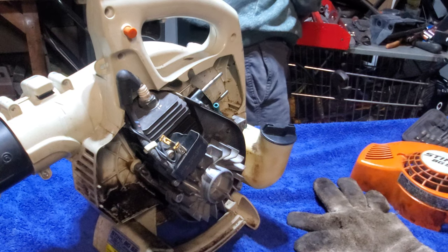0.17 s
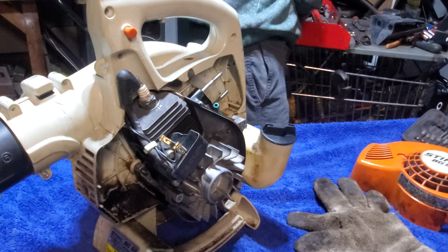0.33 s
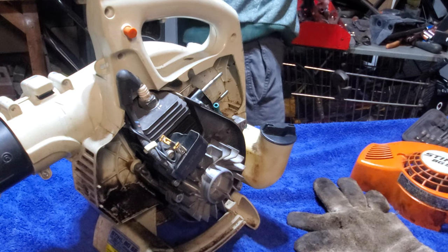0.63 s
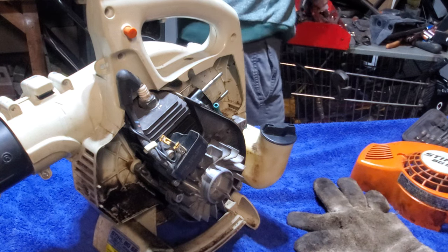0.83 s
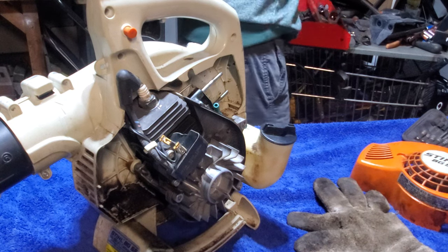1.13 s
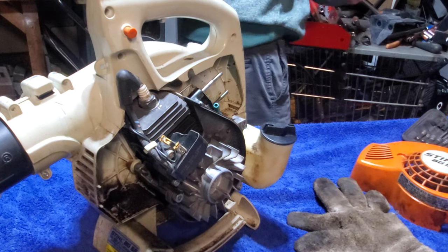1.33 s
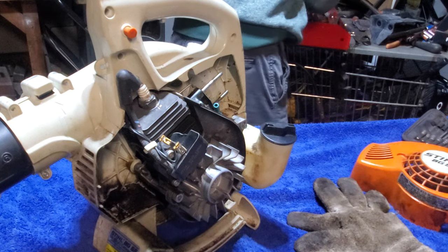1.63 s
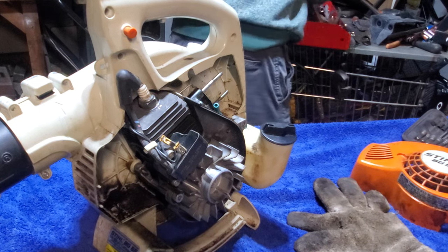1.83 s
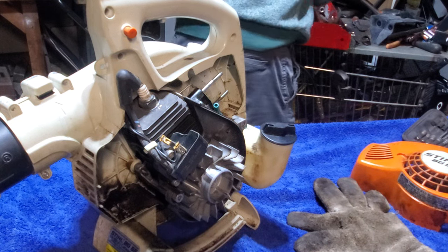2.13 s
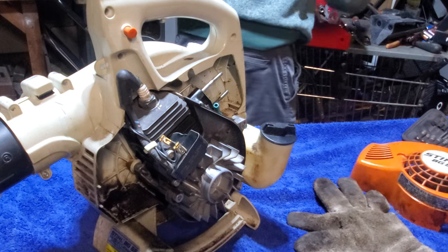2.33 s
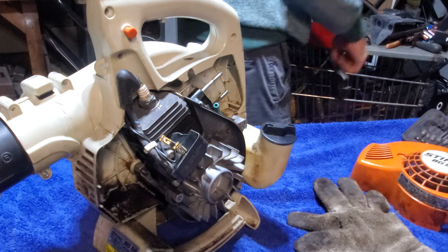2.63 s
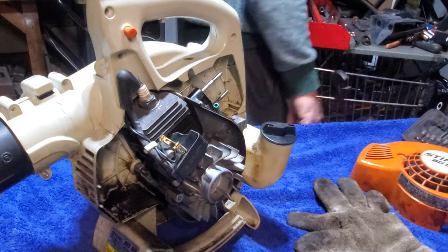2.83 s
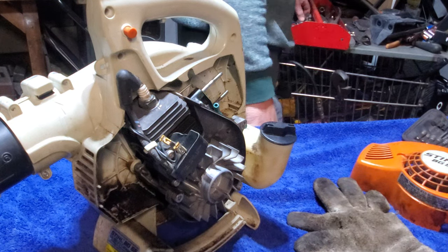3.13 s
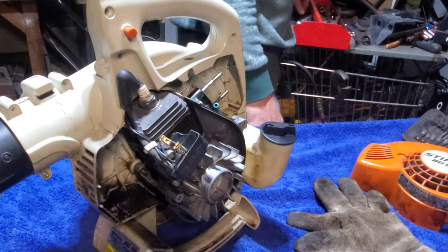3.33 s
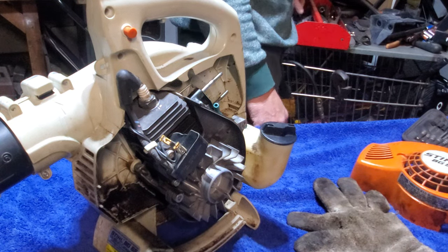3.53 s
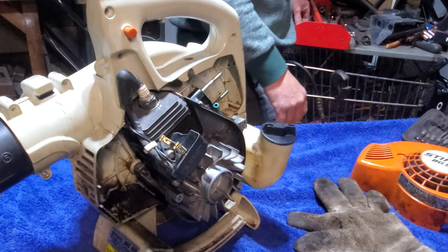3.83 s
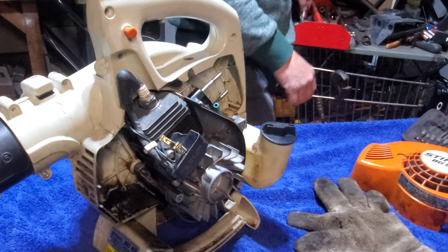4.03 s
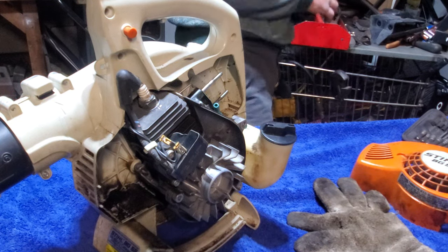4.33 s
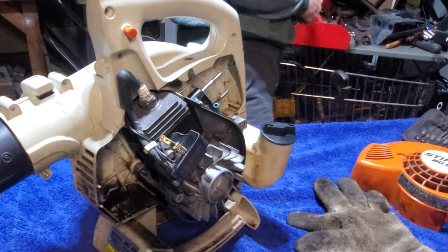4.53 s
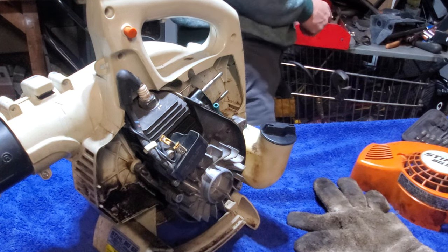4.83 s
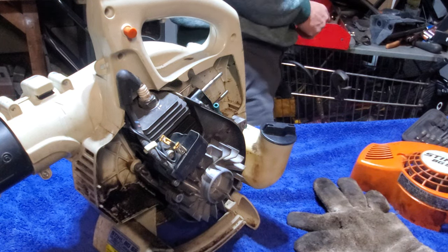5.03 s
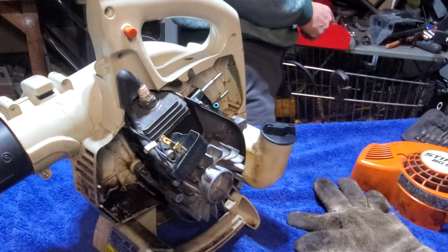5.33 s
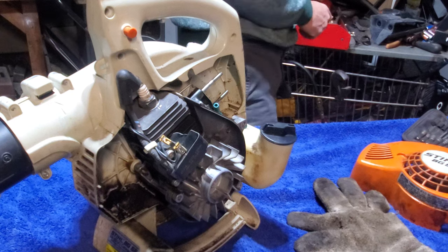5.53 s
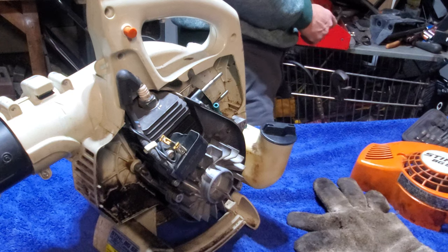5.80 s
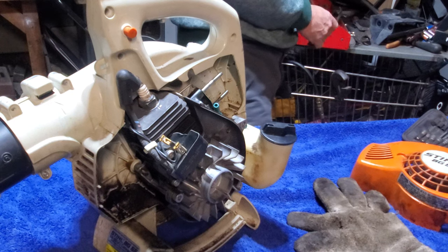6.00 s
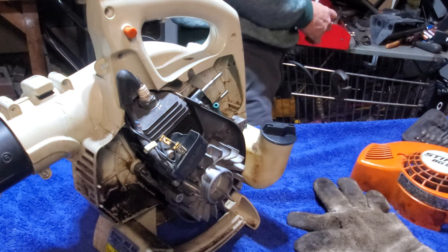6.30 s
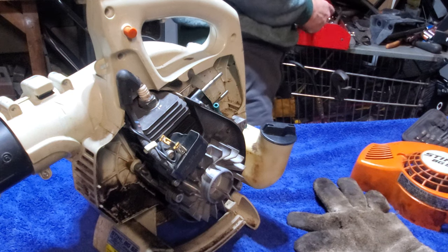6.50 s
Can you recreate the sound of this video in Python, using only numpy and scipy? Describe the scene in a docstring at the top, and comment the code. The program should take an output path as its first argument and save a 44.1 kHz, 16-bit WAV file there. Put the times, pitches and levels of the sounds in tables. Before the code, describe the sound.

Steel sockets and hand tools clink, clatter and thud in a metal tray in bursts, with brief ringing, in a small quiet workshop.

```python
"""Cracks, chatter and thuds of steel sockets and hand tools rummaged in a tray, in a small workshop.
Contacts are noise bursts plus short steel modes, sent through a dense room tail and the tray's resonances.
A wrench rings on, tools, tray panels and loose sockets ring as decaying sines; ticks are narrow-band contacts.
Soft shuffles are swells of filtered noise; below lie an uneven low rumble, a faint sinking drone and hiss."""
import sys
import numpy as np
from scipy import signal
from scipy.fft import rfft, irfft, next_fast_len
from scipy.io import wavfile
from scipy.ndimage import uniform_filter1d

SR = 44100
rng = np.random.default_rng(int(sys.argv[2]) if len(sys.argv) > 2 else 0)


def wav_record(signal):
    """Record a signal, one row per channel, as 16-bit PCM in the file named by sys.argv[1]."""
    frames = np.transpose(np.atleast_2d(signal))
    bounded = np.clip(frames, -1, 1)
    # unit amplitude maps onto the largest positive 16-bit level
    quanta = np.round(bounded * 32767).astype(np.int16)
    wavfile.write(sys.argv[1], SR, quanta)


N = 293706
TOP_HZ = 16000  # band limit
BLOW_S = .04  # contact and tick strengths refer to rms over this time

# left-right likeness of diffuse sound: (frequency [Hz], correlation [-1 to 1])
LIKENESS = [(60, 0.96), (290, .88), (640, .5), (1400, -0.078), (3100, 0.16), (7000, -0.037)]


def amp(db):
    """Decibels to gain."""
    return 10 ** (np.asarray(db) / 20)


def unit(x):
    """Scale to rms 1."""
    return x / np.sqrt(np.mean(x ** 2) + 1e-20)


def along(points, hz):
    """(Hz, value) points read on a log-frequency axis, held flat beyond the ends."""
    f, v = np.transpose(points)
    return np.interp(np.log(hz + 1), np.log(f), v)


def add(track, s, sound):
    """Mix a stereo sound in at time s."""
    start = max(round(s * SR), 0)
    part = track[:, start:][:, :sound.shape[1]]
    part += sound[:, :part.shape[1]]


def coloured(x, gain):
    """Minimum-phase (causal) filter with the given gain of frequency, by the folded cepstrum."""
    size = x.shape[-1]
    m = 2 * next_fast_len(size // 2 + 1024)
    log_gain = np.log(np.maximum(gain(np.fft.rfftfreq(m, 1 / SR)), 1e-7))
    cepstrum = irfft(log_gain)
    cepstrum[1:m // 2] *= 2
    cepstrum[m // 2 + 1:] = 0
    response = np.exp(rfft(cepstrum))
    return irfft(rfft(x, m) * response, m)[..., :size]


def evened(x, width_hz=700):
    """Flatten the broad spectral outline, keep its fine lines; mean energy about 1 a side."""
    power = np.mean(np.abs(rfft(x)) ** 2, 0)
    hz = np.fft.rfftfreq(x.shape[1], 1 / SR)
    outline = np.abs(uniform_filter1d(power, int(width_hz / hz[1]) + 1)) + 1e-9
    return coloured(x, lambda f: np.interp(f, hz, outline) ** -.5)


def diffuse(size):
    """White noise from all sides: the two microphones agree most in the bass."""
    turn = np.arccos(np.clip(along(LIKENESS, np.fft.rfftfreq(size, 1 / SR)), -1, 1)) / 2
    spectra = rfft(rng.standard_normal((2, size)))
    mid, side = irfft(spectra * [np.cos(turn), np.sin(turn)], size)
    return np.array([mid + side, mid - side])


def workshop(direct_db, build_s=0.0023, hold_s=0.032):
    """Room response: direct sound, right side first, then dense reflections that build, hold and die."""
    # reverberation of the room: (frequency [Hz], t60 [s])
    room_t60 = [(100, 0.067), (400, 0.22), (1000, 0.19), (2800, 0.22), (7000, 0.19), (15000, 0.06)]
    hz, t, z = signal.stft(diffuse(size=16384), SR, nperseg=128)
    decay_db = -60 * np.maximum(t - hold_s, 0) / along(room_t60, hz)[:, None]
    tail = signal.istft(z * amp(decay_db), SR, nperseg=128)[1]
    tail *= 1 - np.exp(-np.arange(tail.shape[1]) / SR / build_s)
    tail /= np.sqrt(np.sum(tail ** 2) / 2)
    tail[[0, 1], [5, 0]] += amp(direct_db)  # left arrives 5 samples late
    return tail


def contact(scrape_t60, steel_db, chatter_db=4, snap_db=6, count=80):
    """Steel contact, energy 1: a snap, a chattering noise scrape and many short steel modes."""
    lowest_hz, steel_t60, snap_s = 900, .09, 0.0034  # steel_t60 is the mean over the modes
    t = np.arange(SR // 5) / SR
    knots = t[::40]
    chatter = np.interp(t, knots, rng.standard_normal(len(knots)))
    crack_db = chatter_db * chatter + snap_db * np.exp(-t / snap_s) - 60 * t / scrape_t60
    crack = rng.standard_normal(len(t)) * amp(crack_db)
    place, life, phase = rng.random((count, 3)).T[:, :, None]
    # one mode at random in each of count equal bands
    hz = lowest_hz + (TOP_HZ - lowest_hz) * (np.arange(count)[:, None] + place) / count
    t60 = steel_t60 * (.5 + life)
    steel = np.sum(np.sin(2 * np.pi * (hz * t + phase)) * amp(-60 * t / t60), 0)
    both = crack / np.linalg.norm(crack) + amp(steel_db) * steel / np.linalg.norm(steel)
    return both / np.linalg.norm(both)


def clatter():
    """Contacts in the tray: hardness sets steel share and treble; room and tray resonances shape each."""
    # contacts: (time [s], strength before colouring [dB], hardness [dB, thud < 0 < steel on steel],
    # scrape t60 [s], direct over room [dB])
    contacts = [(.257, -40.5, -8.5, 0.0044, -20), (.815, -56, 3, 0.079, -9), (0.834, -48, 1.5, 0.28, -27),
                (.964, -33.5, 7, 0.22, -17.5), (1.636, -39.5, -1, 0.22, -3.5),
                (1.765, -53, -10, 0.07, -7.5), (1.908, -53.5, -2.5, 0.049, -8),
                (1.973, -41.5, 6, 0.025, -9), (1.994, -36.5, 6.5, 0.053, -11.5),
                (2.047, -38, 2.5, 0.42, 0.5), (2.16, -38.5, -8, 0.019, -10), (2.385, -38, -6.5, 0.027, -29),
                (3.107, -47, 0, .2, -7), (3.122, -40.5, 2.5, 0.025, -6.5), (3.147, -32.5, 3.5, 0.074, -5),
                (3.174, -34, -1, 0.33, -13), (3.263, -30.5, -4.5, 0.054, -5.5),
                (3.294, -31, -0.5, 0.058, -9), (3.323, -29, -4.5, 0.36, -4), (3.384, -31, 5, 0.099, 3),
                (3.504, -39.5, -4.5, 0.17, -2), (3.783, -48, 3, 0.0037, -16.5),
                (3.824, -44.5, -9, 0.12, -1), (3.931, -46, -1, 0.11, -8), (3.98, -42, -2, 0.072, -14),
                (4.029, -39, 3.5, 0.099, 1.5), (4.082, -42.5, -3.5, .03, -8.5),
                (4.843, -37, -7.5, 0.23, -15), (4.875, -32, -1, 0.16, -0.5), (4.986, -32.5, 1, 0.17, -6.5),
                (5.113, -52.5, -2, 0.24, -2), (5.184, -38, -2.5, 0.025, -5.5),
                (5.635, -21.5, 8.5, 0.026, -13.5), (5.649, -24.5, 2.5, 0.24, -11.5),
                (5.715, -30, 4, 0.015, 4.5), (5.887, -48, -2, .13, -9), (5.952, -44.5, -1, 0.049, -2),
                (6.027, -48, -6.5, 0.048, -5.5), (6.059, -38.5, 0, 0.044, -7),
                (6.083, -37, -2, 0.019, -0.5), (6.312, -47, 6, 0.2, -9)]
    # spectrum at hardness 0: (frequency [Hz], level [dB])
    clack = [(40, -12), (130, -1), (260, -1), (420, 6), (850, 5.5), (1900, 10.5), (4200, 5.5), (7000, 1),
             (8600, -8), (13000, -7), (16000, -17.5)]
    # tilt with hardness, bass traded for treble: (frequency [Hz], slope [dB per dB])
    hardening = [(400, -0.77), (850, -0.41), (1900, 0), (4200, 0.4), (7000, 1), (8600, 1.32)]
    # tray resonances: (frequency [Hz], width [Hz], lift [dB])
    tray_peaks = [(177.3, 15, 7), (408.2, 45, 8), (457, 33, 4), (687.7, 36, 7.5), (1185, 79, 2.5),
                  (1444.4, 1100, 3), (6100, 6000, 0.5)]
    steel_at_zero_db, steel_db_per_hardness_db = -6.5, .5  # steel ring over crack

    def tray_db(hz):
        return sum(lift / (1 + (2 * (hz - f) / width) ** 2) for f, width, lift in tray_peaks)

    out = np.zeros((2, N))
    for s, db, hardness, scrape_t60, direct_db in contacts:
        steel_db = steel_at_zero_db + steel_db_per_hardness_db * hardness
        source = contact(scrape_t60, steel_db)[None]
        in_room = evened(signal.fftconvolve(source, workshop(direct_db), axes=1))
        colour = lambda hz: amp(along(clack, hz) + hardness * along(hardening, hz) + tray_db(hz))
        add(out, s, amp(db) * np.sqrt(BLOW_S * SR) * coloured(in_room, colour))
    return out


def note(hz, t60, swell_s=0.005, waver_rad=.4):
    """Decaying mode, nominal rms 1; reflections make its phase wander differently on each side."""
    t = np.arange(int(min(t60, 2) * SR) + SR // 20) / SR
    knots = np.arange(0, 2.1, .008)
    drift = np.array([np.interp(t, knots, row) for row in rng.standard_normal((2, len(knots)))])
    spread = np.arccos(np.clip(along(LIKENESS, hz), -1, 1))
    apart = spread * np.array([[.5], [-.5]]) * rng.choice([-1, 1])
    wander = waver_rad * drift * np.exp(-t / 0.45)
    phase = 2 * np.pi * (hz * t + rng.random()) + apart + wander
    envelope = (1 - np.exp(-t / swell_s)) * amp(-60 * np.maximum(t - .02, 0) / t60)  # 20 ms hold
    return np.sqrt(2) * np.sin(phase) * envelope


def wrench():
    """The wrench rings with the same mode frequencies at every blow, until a touch damps it."""
    # modes: (frequency [Hz], level [dB], t60 [s])
    wrench_modes = [(1502, -4, 1.3), (2245, -8, .28), (2331, -7, .18), (2562, -7, .2), (2678, -2, .29),
                    (3279, 0, 1.05), (3890, -3, .3), (4005, -12, .3), (4700, -6, .22), (5110, -8, .3),
                    (6160, -12, .45), (7991, -15, .28)]
    # blows: (time [s], level [dB], extra of lowest mode [dB], extra of short-lived modes [dB],
    # time from blow to touch [s])
    wrench_hits = [(.964, -44.5, -15, 12, 1), (1.632, -53.5, -4, 2, .5), (2.157, -62, -3, 5, .24),
                   (3.384, -61, 4, 4, .4), (5.634, -44, -16, -2, .25), (6.313, -49.5, 4, 6, .5)]
    long_mode_s, touched_t60 = .8, 0.053  # shorter t60 counts as short-lived; t60 added by the touch
    out = np.zeros((2, N))
    for s, db, low_db, short_db, free_s in wrench_hits:
        for k, (hz, level, t60) in enumerate(wrench_modes):
            ring = note(hz, t60)
            held_s = np.maximum(np.arange(ring.shape[1]) / SR - free_s, 0)
            lift_db = low_db * (k == 0) + short_db * (t60 < long_mode_s)
            add(out, s, amp(db + level + lift_db - 60 * held_s / touched_t60) * ring)
    return out


def struck(modes, hits, side_loss=0):
    """An object rings with its own modes; side_loss [dB per dB] favours the longest in soft blows."""
    out = np.zeros((2, N))
    hardest_db = max(db for _, db in hits)
    longest_t60 = max(t60 for _, _, t60 in modes)
    for s, db in hits:
        for hz, level, t60 in modes:
            side_db = side_loss * (db - hardest_db) * (t60 < longest_t60)
            add(out, s, amp(db + level + side_db) * note(hz, t60))
    return out


def ringing():
    """Modal ringing of the wrench, three other tools, the tray's panels and a socket."""
    # modes of each object: (frequency [Hz], level [dB], t60 [s])
    small_modes = [(1206, 7.5, 0.13), (1810, -12.5, .2), (3390, -5.5, .2), (4177, -6, .2),
                   (5160, -13.5, .25), (8230, -20, .22)]
    long_modes = [(631, 3.5, 0.83), (1650, -4, 0.87), (2640, -1.5, 0.53), (3860, -7, .33)]
    stubby_modes = [(1920, -8.5, 0.34), (2115, 0.5, .2)]
    socket_modes = [(7870, 3, 0.059), (10830, 2.5, .11), (11170, 1, .2)]
    floor_modes = [(410, -2, 0.11), (454, -17, 0.14)]
    wall_modes = [(699, 0, 0.19)]
    # blows on each object: (time [s], level [dB])
    small_hits = [(0.817, -55.5), (1.909, -52.5), (1.974, -42)]
    long_hits = [(1.634, -46.5)]
    stubby_hits = [(4.03, -42)]
    socket_hits = [(3.173, -37), (3.526, -46), (3.786, -49.5)]
    floor_hits = [(.256, -41.5), (2.386, -39.5), (3.824, -37.5), (4.875, -31)]
    wall_hits = [(.964, -41), (1.765, -48), (6.312, -53)]
    tools = struck(small_modes, small_hits) + struck(long_modes, long_hits)
    tools += struck(stubby_modes, stubby_hits)
    panels = struck(floor_modes, floor_hits) + struck(wall_modes, wall_hits)
    return wrench() + tools + panels + struck(socket_modes, socket_hits, side_loss=1)


def ticks():
    """Light high touches: short contacts in narrow treble bands, without tray resonance."""
    # touches: (time [s], level [dB])
    touches = [(.928, -46), (1.131, -58.5), (1.253, -50), (1.356, -65.5)]
    # bands they sound in: (centre [Hz], width [Hz], level [dB])
    tick_bands = [(8230, 3500, 8), (13400, 1200, -24)]

    def band_gain(hz):
        return sum(amp(db) / (1 + (2 * (hz - centre) / width) ** 2) for centre, width, db in tick_bands)

    out = np.zeros((2, N))
    for s, db in touches:
        source = contact(scrape_t60=0.0086, steel_db=-14.5)[None]
        in_room = signal.fftconvolve(source, workshop(direct_db=-4.5), axes=1)
        sound = coloured(in_room, band_gain)
        add(out, s, amp(db) * np.sqrt(2 * BLOW_S * SR) * sound / np.linalg.norm(sound))
    return out


def shuffles():
    """Soft rubs and bumps of the hand among the tools: swells of band-filtered diffuse noise."""
    # swells: (time of peak [s], peak level [dB], centre [Hz])
    swells = [(0.415, -61.5, 724), (.718, -73, 1530), (2.421, -44, 193), (3.077, -56.5, 516),
              (3.137, -45.5, 2010), (3.541, -51, 275), (4.231, -56, 247)]
    half_length_s = 0.036  # to 1/e
    out = np.zeros((2, N))
    t = np.arange(SR // 2) / SR
    middle = t.mean()
    envelope = np.exp(-((t - middle) / half_length_s) ** 2)
    for s, db, centre in swells:
        band = lambda hz: 1 / (1 + (np.log((hz + 1) / centre) / 0.55) ** 4)
        rub = unit(coloured(diffuse(size=len(t)), band))
        add(out, s - middle, amp(db) * rub * envelope)
    return out


def background():
    """Diffuse noise split into an unevenly fluctuating low rumble and steady hiss, plus a sinking drone."""
    # noise spectrum, relative: (frequency [Hz], density [dB per Hz])
    floor_spectrum = [(13, -41.5), (22, -23.5), (70, 0.5), (165, -17), (229, -21.5), (337, -26), (366, -31),
                      (861, -42), (1230, -41.5), (2670, -45), (2980, -45), (4260, -46.5), (5170, -49.5),
                      (11200, -49.5), (16000, -52.5)]
    # gain of the noise's low part: (time [s], level [dB])
    rumble_levels = [(0.0, -66.5), (0.28, -55), (0.8, -66), (1.05, -56), (3.86, -61.5), (4.01, -55),
                     (4.6, -62.5), (5.23, -59.5), (5.45, -61.5), (6.66, -60)]
    # drone swells: (time of peak [s], pitch at peak [Hz], peak level [dB], half length to 1/e [s])
    drone_swells = [(5.15, 70.4, -56.5, 0.21), (6.45, 58.8, -56, 0.32)]
    hiss_gain_db, sink_per_s = -59.5, .2  # drone pitch falls exponentially at sink_per_s
    t = np.arange(N) / SR
    air = unit(coloured(diffuse(size=N), lambda hz: amp(along(floor_spectrum, hz))))
    low = signal.sosfiltfilt(signal.butter(2, 180, fs=SR, output="sos"), air)
    drone = 0
    for s, hz, db, length_s in drone_swells:
        pitch_hz = hz * np.exp(-sink_per_s * (t - s))
        tone = np.sqrt(2) * np.sin(2 * np.pi * np.cumsum(pitch_hz) / SR)
        drone = drone + amp(db) * np.exp(-((t - s) / length_s) ** 2) * tone
    rumble = amp(np.interp(t, *np.transpose(rumble_levels))) * low
    hiss = amp(hiss_gain_db) * (air - low)
    return rumble + hiss + drone


def scene():
    """Sum of all sources."""
    return clatter() + ringing() + ticks() + shuffles() + background()


def record(dry):
    """Steep low-pass at TOP_HZ."""
    m = next_fast_len(N + SR // 2)
    passed = 1 / (1 + (np.fft.rfftfreq(m, 1 / SR) / TOP_HZ) ** 200)
    return irfft(rfft(dry, m) * passed, m)[:, :N]


dry = scene()
out = record(dry)
wav_record(out)
```